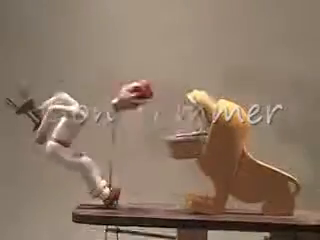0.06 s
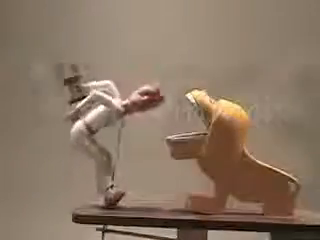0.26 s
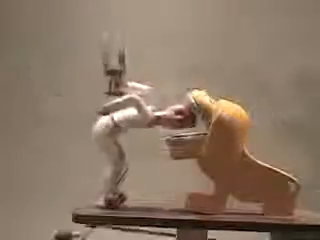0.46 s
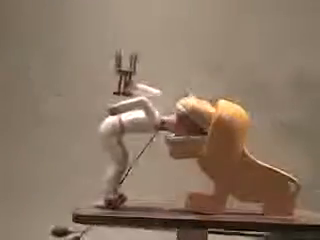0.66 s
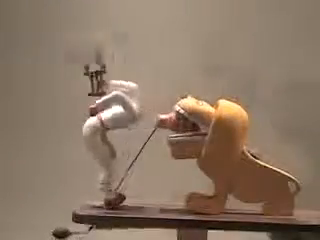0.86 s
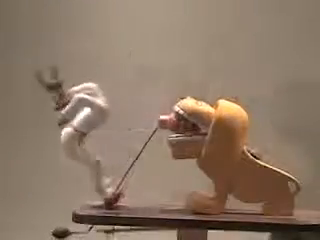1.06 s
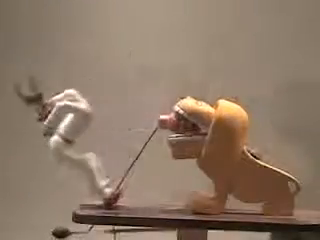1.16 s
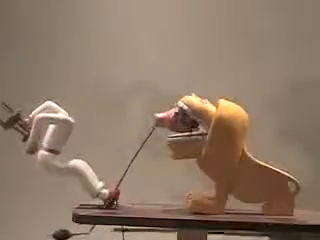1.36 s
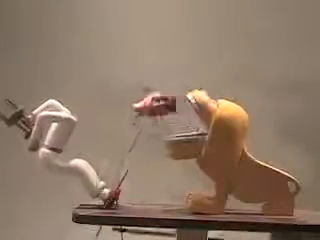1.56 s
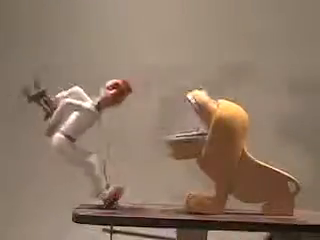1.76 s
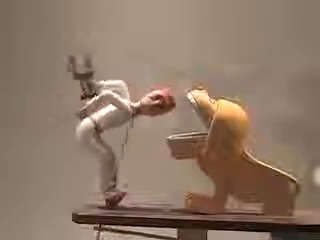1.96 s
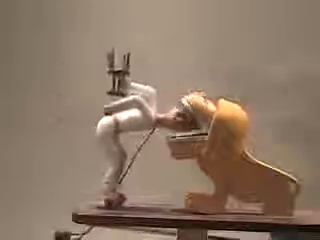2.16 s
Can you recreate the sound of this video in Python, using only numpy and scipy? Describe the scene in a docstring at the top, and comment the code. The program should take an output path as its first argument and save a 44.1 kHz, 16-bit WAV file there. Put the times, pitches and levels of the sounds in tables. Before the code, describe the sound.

A mechanical wooden toy clacks sharply at about 0.2 seconds, just after a few soft knocks. Faint wire ticks come near 0.6 and 1 second, with a light wooden tap at 0.8. A quick rattling knock at 1.55 leads to a second sharp clack at 1.85, then faint ticks. Throughout, a low motor hum, thin whine and steady rush of air fill the small room.

```python
"""A small room, where a wooden whirligig turns. Twice its figure drops against a stop with a sharp
clack and the stand shudders. Around the clacks the lion's jaw taps shut, the head knocks on its rod
and the wire linkage ticks: each contact is a short noisy crack over the part's ringing modes.
Behind the toy a motor hums with a thin whine, and air rushes steadily."""
import sys
import numpy as np
from scipy import signal
from scipy.fft import rfft, irfft, next_fast_len
from scipy.io import wavfile
from scipy.ndimage import map_coordinates

SR = 44100
rng = np.random.default_rng(int(sys.argv[2]) if len(sys.argv) > 2 else 0)


def wav_out(sig):
    """Save sig, one row per channel (or a flat mono array), as 16-bit PCM at SR to the path in sys.argv[1]."""
    wavfile.write(sys.argv[1], SR, np.round(np.clip(np.atleast_2d(sig).T, -1, 1) * 32767).astype(np.int16))


N = 97020  # 2.2 s

# The figure hitting its stop. Each row: start in seconds, level in dB.
CLACKS = [(0.212, -12.5), (1.8423, -12.5)]
# Its woody ring. Each row: pitch in Hz, relative level in dB, seconds to fade by 60 dB.
FIGURE_MODES = [(1021, -22, 0.12), (1650, -13, 0.12), (1938, -7, 0.081), (2392, -2.5, 0.055),
                (2465, -6.5, 0.093), (2777, -2.5, .04), (2883, -6.5, 0.055), (3190, 2, .022),
                (3590, 0.5, 0.025), (3700, -5, .035), (4393, -9, 0.062), (4700, -6, 0.047),
                (6180, -9.5, .025), (6850, -5, 0.019), (8400, -23, 0.025)]
# The tone of its crack. Each row: frequency in Hz, gain in dB.
FIGURE_CRACK = [(150, -30.5), (700, -22), (1500, -9.5), (2100, -2), (3200, 2.5), (4100, -3), (5000, -3.5),
                (6000, -12), (7000, -9.5), (7500, -23.5), (8500, -17.5), (9300, -44)]


def figure_clack(hit):
    """The wooden figure drops on its stop: one sharp crack and a short ring."""
    return struck([hit], FIGURE_MODES, FIGURE_CRACK, crack_db=9, crack_t60=0.04, attack_s=0.00059)


def stand_shudder(hz=90.6, below_clack_db=32.5, rise_s=0.036):
    """The stand's low shudder swells and fades after each clack, as mid and side."""
    out, t = np.zeros(N), np.arange(SR // 2) / SR
    swell = (t / rise_s * np.exp(1 - t / rise_s)) ** 2
    for start, db in CLACKS:
        add(out, start, amp(db - below_clack_db) * swell * np.sin(2 * np.pi * hz * t))
    return np.array([out, amp(-10) * out])


# The head knocking on its rod. Each row: start in seconds, level in dB.
KNOCKS = [(.004, -33), (.019, -35), (0.027, -40), (1.5543, -24), (1.5571, -23), (1.5619, -26),
          (1.6514, -32), (1.658, -36)]
# Its ring. Each row: pitch in Hz, relative level in dB, seconds to fade by 60 dB.
HEAD_MODES = [(1418, 5.5, 0.038), (1640, -12.5, 0.074), (1850, -7, 0.024), (1997, -0.5, 0.072),
              (3130, -14.5, 0.059), (3817, -4, 0.032), (6740, -17, .04)]
# The tone of its crack. Each row: frequency in Hz, gain in dB.
HEAD_CRACK = [(200, -22.5), (600, -11), (950, -6), (1500, 9.5), (2400, -6.5), (3200, -0.5), (4400, -9.5),
              (6000, -17.5), (6800, -12), (7600, -23), (9000, -21)]


def head_knocks(soft_below_db=-31, soft_cutoff_hz=3000):
    """The loose head hits its rod: hard knocks are bright, light rebounds duller."""
    contact = dict(crack_db=11.5, crack_t60=0.022, attack_s=0.00021)
    hard = struck([(s, db) for s, db in KNOCKS if db > soft_below_db], HEAD_MODES, HEAD_CRACK, **contact)
    soft = struck([(s, db) for s, db in KNOCKS if db <= soft_below_db], HEAD_MODES, HEAD_CRACK, **contact)
    return hard + signal.lfilter(*signal.butter(2, soft_cutoff_hz, fs=SR), soft)


# The jaw closing. Each row: start in seconds, level in dB.
TAPS = [(.8157, -29)]
# Its ring. Each row: pitch in Hz, relative level in dB, seconds to fade by 60 dB.
JAW_MODES = [(1646, 6, 0.055), (1954, 4, 0.047), (2580, -4, .05), (3340, -1, 0.042), (3670, 7.5, 0.032),
             (4070, 0.5, .06), (4910, 1, 0.026)]
# The tone of its crack. Each row: frequency in Hz, gain in dB.
JAW_CRACK = [(300, -8), (1100, -11), (2000, 3.5), (4500, -1), (5400, -6), (6500, -16), (9000, -23.5)]


def jaw_tap():
    """The lion's jaw shuts with a light, snappy wooden tap."""
    return struck(TAPS, JAW_MODES, JAW_CRACK, crack_db=6, crack_t60=0.028, attack_s=0.0002)


# The linkage ticking. Each row: start in seconds, level in dB.
TICKS = [(.596, -40.5), (.9535, -38), (1.638, -46), (2.032, -40), (2.087, -48)]
# Its thin ring. Each row: pitch in Hz, relative level in dB, seconds to fade by 60 dB.
WIRE_MODES = [(1980, -14, .04), (2930, -2.5, .06), (3395, 2.5, 0.046), (5020, 7.5, 0.036),
              (7400, -16, 0.024)]
# The tone of its crack. Each row: frequency in Hz, gain in dB.
WIRE_CRACK = [(500, -35), (3000, -3), (5000, -1), (6500, -11), (9000, -15.5)]


def wire_ticks():
    """Faint contacts set the wire linkage ringing, high and brief."""
    return struck(TICKS, WIRE_MODES, WIRE_CRACK, crack_db=1, crack_t60=0.035, attack_s=0.0008)


def struck(hits, modes, crack_tone, crack_db, crack_t60, attack_s):
    """Each contact rings the part's modes under a short noisy crack."""
    out, t = np.zeros(N), np.arange(SR // 4) / SR
    ring = sum((-1) ** k * amp(db - 60 * t / t60) * np.sin(2 * np.pi * hz * t)
               for k, (hz, db, t60) in enumerate(modes))
    blow = ring * (1 - np.exp(-t / attack_s)) / 2
    add(blow, 0, amp(crack_db) * coloured(crack(crack_t60), crack_tone))
    for start, db in hits:
        add(out, start, amp(db) * blow)
    return out


def crack(t60, rise_s=0.00036):
    """A dying noise burst with an even spectrum: the part's many small, dense modes."""
    t = np.arange(SR // 8) / SR
    fade = amp(-60 * t / t60) * (1 - np.exp(-t / rise_s))
    burst = rng.standard_normal(len(t)) * fade
    for _ in range(4):  # flatten the spectrum, then restore the decay
        flat_spectrum = np.exp(1j * np.angle(rfft(burst, 2 * len(t))))
        burst = irfft(flat_spectrum)[:len(t)] * fade ** (1 / 4)
    return burst * np.linalg.norm(fade) / np.linalg.norm(burst)


# Early reflections off near surfaces. Each row: delay in seconds, gain in dB.
REFLECTIONS = [(.0045, -9.5), (.0102, -18), (.0207, -16.5), (.0305, -27)]
# Stereo width of the direct sound. Each row: frequency in Hz, side over mid in dB.
DIRECT_WIDTH = [(100, -29), (1500, -17), (3000, -24.5), (5500, -23), (8000, -4.5)]
# Stereo width of the tail. Each row: frequency in Hz, side over mid in dB.
TAIL_WIDTH = [(100, 6.5), (300, -8), (600, -8), (1200, -33), (2000, -16.5), (3500, -26.5), (5500, -19),
              (8000, 0.5)]


def in_room(dry, wet_db):
    """Direct sound, early reflections and a fresh tail, as mid and side."""
    mid = dry.copy()
    for delay, db in REFLECTIONS:
        add(mid, delay, amp(db) * dry)
    mid_tail, side_tail = (amp(wet_db) * signal.fftconvolve(dry, room_tail())[:N] for _ in range(2))
    side = filtered(dry, lambda hz: 1j * amp(along(DIRECT_WIDTH, hz)))  # a quarter cycle out of phase
    return np.array([mid + mid_tail, side + coloured(side_tail, TAIL_WIDTH)])


# The room's decay. Each row: frequency in Hz, seconds to fade by 60 dB.
ROOM_T60 = [(150, 0.43), (1000, .48), (3000, 0.41), (5000, 0.42), (9000, 0.31)]
# Its boxy tone. Each row: frequency in Hz, gain in dB.
ROOM_TONE = [(100, -2.5), (450, 19), (1000, 7.5), (1600, 5), (2500, 3), (3300, 1), (4700, 4), (6800, 0),
             (9000, -2)]


def room_tail(build_s=0.0039):
    """A diffuse tail in which each frequency dies at its own speed."""
    hz, t, noise = signal.stft(rng.standard_normal(SR // 2), SR, nperseg=256)
    fade = amp(-60 * t / along(ROOM_T60, hz)[:, None])
    tail = signal.istft(noise * fade * (1 - np.exp(-t / build_s)), SR, nperseg=256)[1]
    return coloured(tail / np.linalg.norm(tail), ROOM_TONE)


# The motor's hum. Each row: pitch in Hz, mid level in dB, side level in dB.
HUM = [(59.5, -62.5, -57), (118.4, -49, -43.5), (139.8, -53, -72), (216.7, -56.5, -69),
       (243.4, -60.5, -57.5), (360, -62.5, -70), (467.6, -66, -78), (1141, -58, -86), (1430, -64, -94)]
# Its faint whine. Each row: harmonic number, level in dB.
WHINE = list(zip(range(15, 21), [-64.5, -67, -62, -65, -66.5, -70.5]))


def motor(whine_base_hz=299.8, waver_db=1, drift_rad=0.082):
    """A motor hums a little unsteadily under a thin whine, as mid and side."""
    out, t = np.zeros((2, N)), np.arange(N) / SR
    for hz, mid_db, side_db in HUM:
        phase = 2 * np.pi * hz * t + drift_rad * wobble(5.3)
        tone = np.array([amp(mid_db) * np.sin(phase), -amp(side_db) * np.cos(phase)])
        out += amp(waver_db * wobble(5.07)) * tone
    for harmonic, db in WHINE:
        phase = 2 * np.pi * (harmonic * whine_base_hz * t + rng.random()) + drift_rad * wobble(6.4)
        out[0] += amp(db) * np.sin(phase)
    return np.sqrt(2) * out  # the levels are rms


# The air bed's tone, mid and side. Each row: frequency in Hz, relative noise density in dB.
AIR_MID = [(15, -69), (25, -30), (35, -22.5), (48, -15.5), (67, -13.5), (85, -24), (101, -11), (123, -3),
           (161, -10.5), (227, -12.5), (298, -24), (345, -12), (381, -15), (475, -8.5), (592, -16.5),
           (686, -11.5), (899, -15), (1070, -8.5), (1210, -17), (1330, -10.5), (1830, -17.5), (4010, -23.5),
           (5260, -25.5), (7060, -41.5), (8800, -45.5), (11400, -87), (19400, -120)]
AIR_SIDE = [(15, -50), (25, -24), (59, 0.5), (85, -21), (104, 4.5), (129, 1), (161, 6), (182, -25),
            (222, -10), (291, -30.5), (354, -12.5), (1360, -23), (2640, -54), (3140, -50), (3380, -82),
            (3920, -59.5), (4650, -91), (5010, -49), (5390, -85), (6720, -37.5), (8800, -44), (11400, -79),
            (19400, -120)]


def air_rush(mid_db=-43, side_db=-45.5):
    """Moving air makes a steady bed of dark noise, as mid and side."""
    def rush(tone):
        noise = filtered(rng.standard_normal(N), lambda hz: amp(along(tone, hz)))
        return noise / np.sqrt(np.mean(noise ** 2))
    return np.array([amp(mid_db) * rush(AIR_MID), amp(side_db) * rush(AIR_SIDE)])


def amp(db):
    """Decibels to gain."""
    return 10 ** (np.asarray(db) / 20)


def along(points, hz):
    """Read a curve of (Hz, value) points on a log frequency axis."""
    freqs, values = np.transpose(points)
    return np.interp(np.log(hz + 1), np.log(freqs + 1), values)


def wobble(rate):
    """A smooth random curve, rate knots a second."""
    knots = rng.standard_normal(int(N * rate / SR) + 4)
    return map_coordinates(knots, [np.arange(N) * rate / SR])


def filtered(x, response):
    """Multiply the spectrum of x by response(hz)."""
    n = x.shape[-1]
    size = next_fast_len(n + SR // 4)
    return irfft(rfft(x, size) * response(np.fft.rfftfreq(size, 1 / SR)), size)[..., :n]


def coloured(x, points, size=2048):
    """Minimum-phase EQ through (Hz, dB) points: nothing rings ahead of an attack."""
    gain = amp(along(points, np.fft.rfftfreq(size, 1 / SR)))
    cepstrum = irfft(np.log(gain))
    cepstrum[1:size // 2] *= 2
    cepstrum[size // 2 + 1:] = 0
    return signal.fftconvolve(x, irfft(np.exp(rfft(cepstrum))))[:len(x)]


def add(track, start_s, sound):
    """Mix a sound into a track at start_s."""
    start = max(0, round(start_s * SR))
    part = sound[:max(0, len(track) - start)]
    track[start:start + len(part)] += part


def scene():
    """The toy's four moving parts in the room, over motor and air, as left and right."""
    # each clack rings out in its own diffuse room tail
    clacks = sum(in_room(figure_clack(hit), wet_db=-3.5) for hit in CLACKS)
    light_contacts = in_room(jaw_tap() + wire_ticks(), wet_db=-9)
    knocks = in_room(head_knocks(), wet_db=-9.5)
    mid, side = clacks + stand_shudder() + light_contacts + knocks + air_rush() + motor()
    return np.array([mid + side, mid - side])


def record(dry, top_hz=9000):
    """A steep low-pass takes off the top of the treble."""
    return filtered(dry, lambda hz: 1 / np.sqrt(1 + (hz / top_hz) ** 160))


dry = scene()
out = record(dry)
wav_out(out)
```